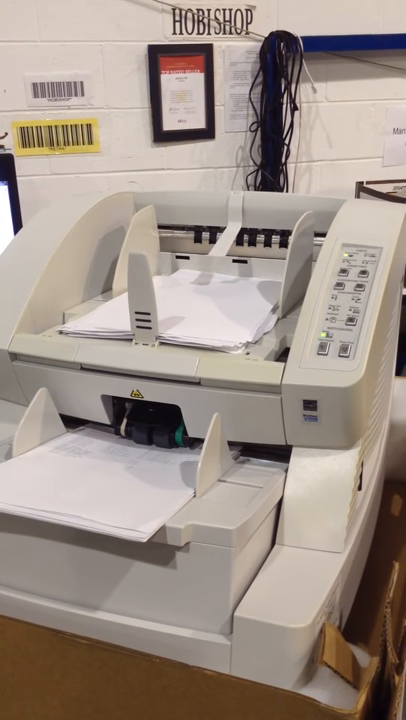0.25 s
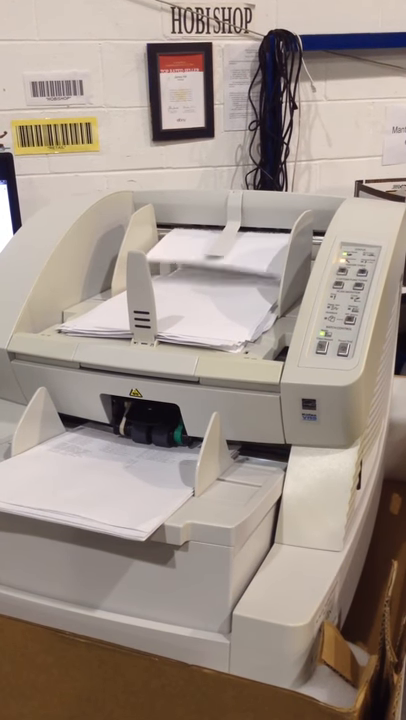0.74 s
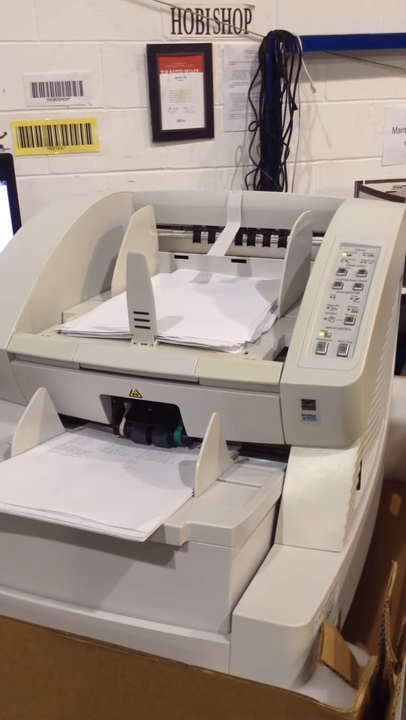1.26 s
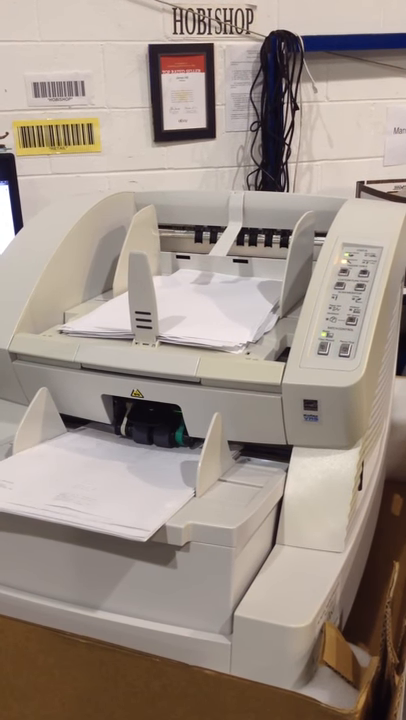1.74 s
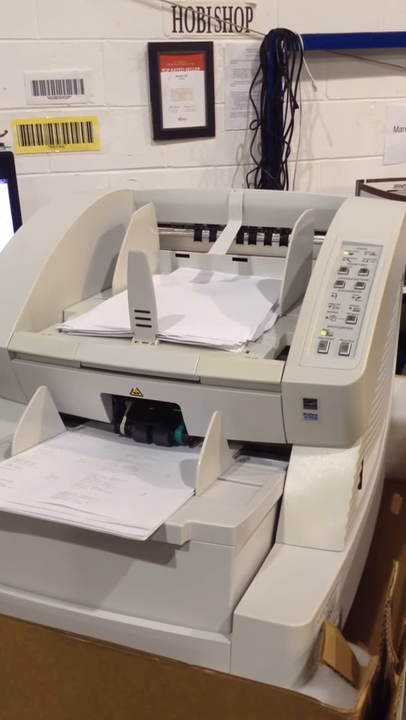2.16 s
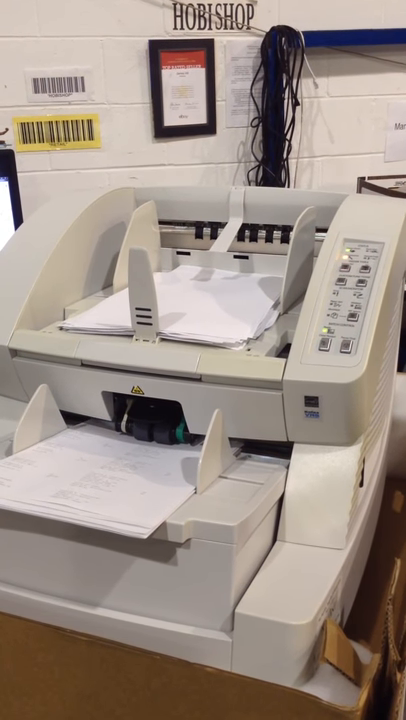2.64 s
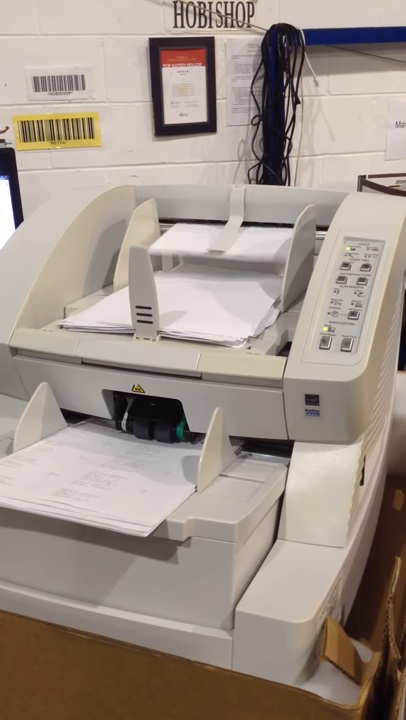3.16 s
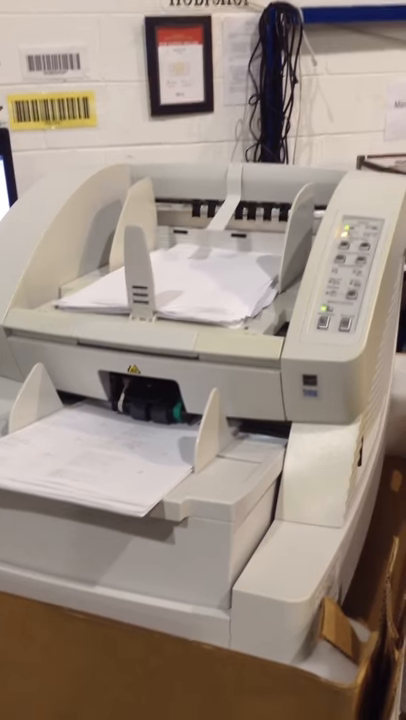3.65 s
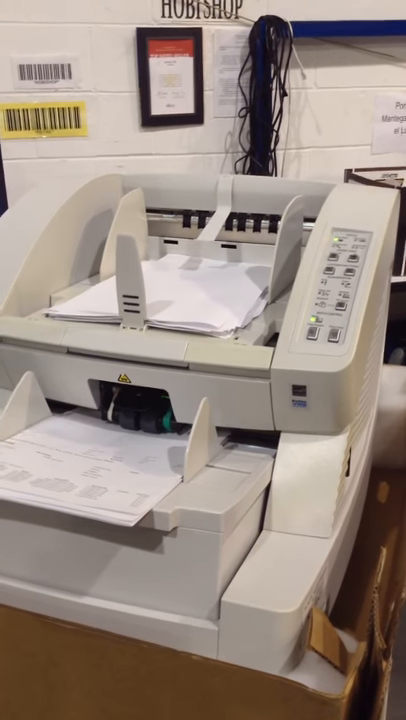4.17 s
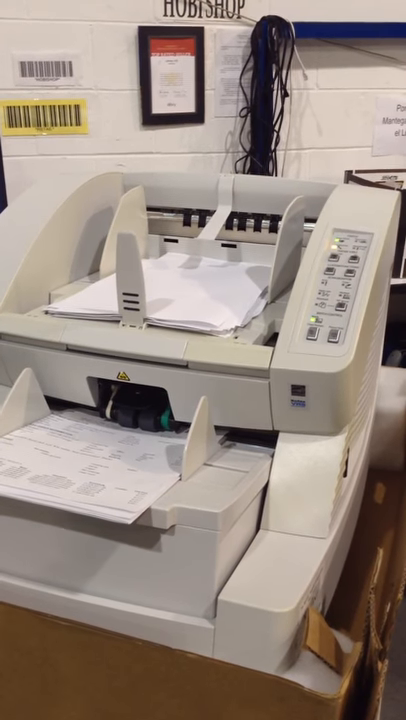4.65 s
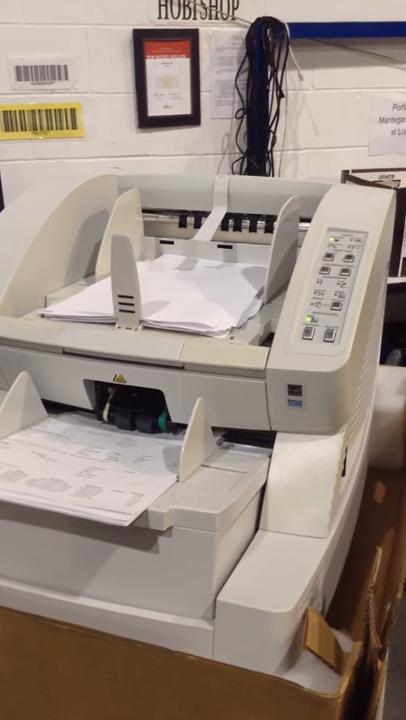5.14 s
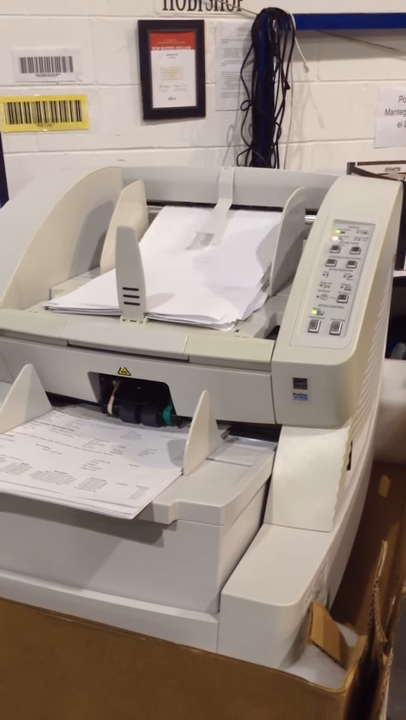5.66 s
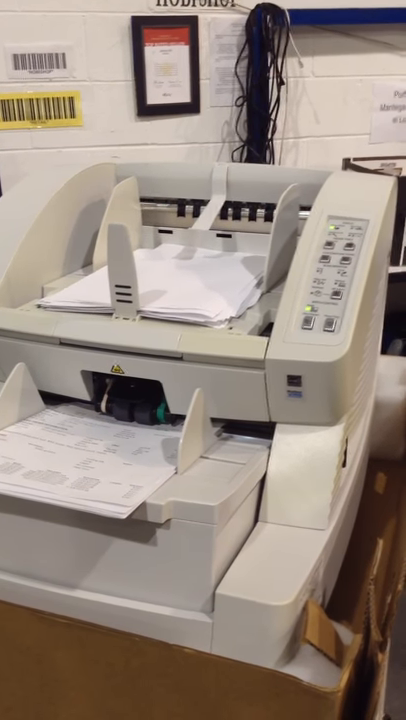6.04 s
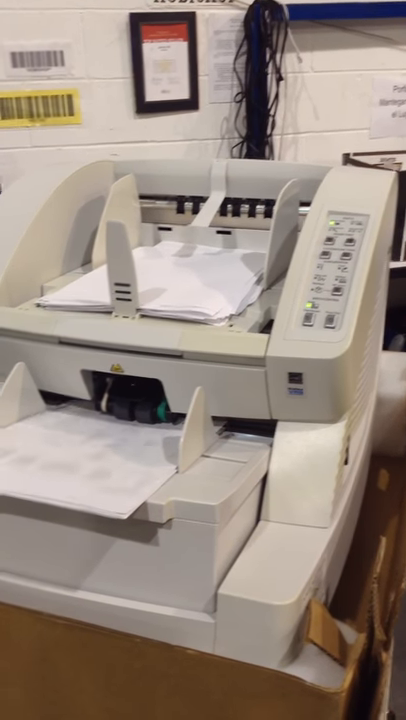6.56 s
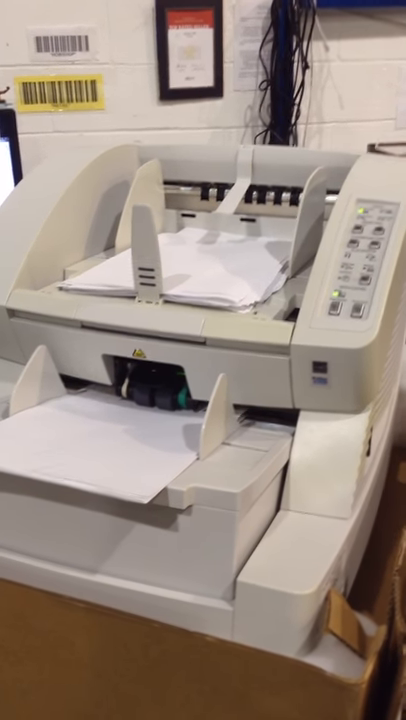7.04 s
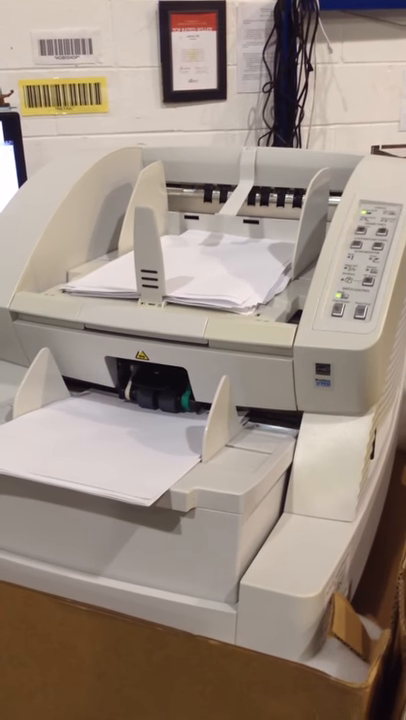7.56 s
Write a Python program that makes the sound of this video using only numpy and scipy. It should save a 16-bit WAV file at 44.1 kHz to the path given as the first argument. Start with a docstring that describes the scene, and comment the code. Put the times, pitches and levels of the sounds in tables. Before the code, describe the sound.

Heard up close in a small room, sheets of paper pass through a document scanner in a regular cycle. One swishes out with a flick and a snap, then the next is drawn in with a high hiss, clicks and soft thumps. This happens three times, with one loud clack about halfway. A motor whine and a fan's rush continue underneath.

```python
"""Document scanner, close up.

A stepping motor whines on steady orders over fan noise, roller hum and faint electrics.
Each sheet is pulled in with a bright hiss and a rumble, thumps the casing, rustles out on the tray
and snaps as its edges catch on rollers and guides. One microphone, small room."""
import sys
import numpy as np
from scipy import signal
from scipy.fft import rfft, irfft, next_fast_len
from scipy.io import wavfile
from scipy.ndimage import uniform_filter1d, map_coordinates

SR = 44100
rng = np.random.default_rng(int(sys.argv[2]) if len(sys.argv) > 2 else 0)


def bounce(signal):
    """Save signal as a 16-bit WAV file at the path given by the first command-line argument."""
    frames = np.transpose(np.atleast_2d(signal))
    limited = np.clip(frames, -1, 1)
    pcm = np.round(limited * 32767).astype(np.int16)
    wavfile.write(sys.argv[1], SR, pcm)


N = 343980

# Supply whine. Each row: time in seconds, frequency in Hz, rms level in dB.
SUPPLY_WHINE = [(0, 14495, -63), (.6, 14505, -65), (1, 14510, -76), (3, 14515, -78), (6.4, 14300, -74),
                (7.8, 14525, -68)]
# Motor tones. Each entry: multiple of the step rate.
MOTOR_ORDERS = [4, 6, 8, 12, 20, 35, 40, 45, 50, 55, 60, 85, 95, 100, 105, 110, 115, 120, 125, 135, 140,
                145, 150, 155, 160]
# Each entry: rms level in dB of the matching order.
ORDER_LEVELS_DB = [-66.5, -65.5, -49, -60, -62, -73.5, -74.5, -66.5, -87, -75.5, -77, -70, -76, -75, -72,
                   -72, -70, -69.5, -69, -83, -74, -70, -70, -72, -73]
# Spells of roller hum. Each row: start in seconds, end in seconds, rms level in dB.
ROLLER_HUMS = [(.45, .8, -54.5), (1.74, 2.0, -60), (2.815, 3.25, -54.5), (3.97, 4.453, -52.5),
               (5.05, 5.42, -54.5), (6.95, 7.25, -54.5), (7.601, 7.8, -57)]
# Spectra of fan, sliding paper and crinkling paper. Each row: frequency in Hz, relative density in dB.
FAN_SPECTRUM = [(25, -34), (60, -15.5), (150, -7), (230, -6.5), (450, -5.5), (650, -4), (900, -4),
                (1350, -8.5), (1550, -14), (2200, -15.5), (3200, -18), (5000, -20.5), (8000, -21),
                (12500, -22.5), (14300, -41), (15400, -35)]
HISS_SPECTRUM = [(2650, -22.5), (4500, -18.5), (6550, -10), (8010, -9), (9020, -6), (10400, -6.5),
                 (12900, 1), (14700, -2), (15400, -9)]
RUSTLE_SPECTRUM = [(500, -25), (900, 0), (2000, -2), (4000, -6), (6500, -7), (9000, -12), (15400, -26)]
# Casing resonances. Each row: centre in Hz, width in Hz, gain in dB.
CASING_MODES = [(144, 56, -3.5), (209, 62, 0.5), (289.5, 54, 0), (376, 66, -3.5), (680, 640, -12.5)]
# Sheets pulled in. Each row: bite, grip, hiss fade and release in seconds, then hiss, drag rustle,
# drag rumble, grip rustle, grip rumble and release rumble in dB.
SHEET_FEEDS = [(1.701, 1.794, 2.27, 2.3, -41.5, -56.5, -54, -45.5, -38, -44),
               (3.98, 4.057, 4.485, 4.57, -40.5, -54.5, -52.5, -47.5, -38.5, -42),
               (6.56, 6.673, 7.06, 7.2, -43.5, -51, -50.5, -45, -40.5, -49)]
# Sheets pushed out. Each row: emergence, edge flick and drop in seconds, then hiss, flick, rustle in dB.
SHEET_EXITS = [(0.537, .92, 1.13, -52.5, -41, -56), (3.02, 3.338, 3.54, -50.5, -40.5, -58.5),
               (5.236, 5.629, 5.76, -52, -40.5, -56.5)]
# Loose crinkles of the stacks. Each row: time in seconds, then rustle, hiss and rumble in dB.
STACK_CRINKLES = [(.01, -50.5, -52, -51), (.385, -49, -52, -64), (.45, -48, -60, -59),
                  (1.18, -60, -50, -66), (1.55, -50, -49, -66), (1.64, -45.5, -50, -50),
                  (2.43, -67, -48.5, -64), (2.57, -65, -54, -56), (3.34, -51, -60, -65),
                  (3.49, -54, -55, -58), (3.69, -51, -54, -53), (4.57, -48, -62, -60),
                  (4.69, -56, -51, -58), (5.3, -52.5, -56, -58), (5.64, -49, -60, -60),
                  (5.75, -47, -55, -45), (5.97, -57, -64, -53), (7.31, -53, -50.5, -56),
                  (7.44, -49, -54, -47)]
# Floor between sheets: rustle, hiss and rumble in dB.
PAPER_FLOOR_DB = (-63, -59, -55.5)
# Sheets hitting the casing. Each row: start in seconds, level in dB, pitch in Hz, T60 in seconds.
CASING_THUMPS = [(.277, -34.5, 543, 0.046), (1.681, -36.5, 371, 0.24), (1.726, -32, 259, 0.086),
                 (2.291, -35.5, 249, 0.2), (2.563, -35, 620, 0.046), (3.6250, -9.5, 425, 0.015),
                 (3.853, -33.5, 387, 0.044), (3.973, -29, 269, 0.082), (4.06, -28.5, 331, 0.13),
                 (4.294, -33.5, 298, 0.082), (4.551, -35, 307, 0.12), (4.817, -29, 334, 0.032),
                 (5.19, -34.5, 375, 0.043), (5.341, -34.5, 603, 0.037), (5.53, -39, 610, .04),
                 (5.965, -31, 548, 0.11), (6.606, -39, 377, 0.12), (6.669, -31, 271, 0.19),
                 (7.18, -34.5, 244, 0.13)]
# Edges catching. Each row: start in seconds, ring peak in dB, knock and crackle in dB over the ring,
# pitch in Hz, T60 in seconds.
EDGE_SNAPS = [(0.277, -38, -11, 5, 1920, 0.035), (0.375, -32.5, -21, -5, 1467, 0.13),
              (.3894, -33, -16, -6, 4400, 0.067), (1.0466, -24, -13, 4, 3180, 0.0088),
              (1.0486, -24.5, -2, -3, 2120, 0.026), (1.5284, -48, -11, 8, 2480, .05),
              (1.6677, -43.5, 8, 13.5, 2970, 0.09), (1.703, -40, -4, 6, 1740, .04),
              (1.7719, -34.5, -6, 13, 2640, 0.023), (1.8044, -34, 2.5, -4, 1730, 0.053),
              (2.2989, -39.5, 6, 4, 1700, 0.033), (2.4264, -47, -3, 9, 2590, 0.035),
              (3.4686, -27, -3.5, 1, 2470, 0.035), (3.4853, -36, -6, -4, 2620, .03),
              (3.6196, -34, -8, -14, 3460, 0.0041), (3.6220, -12.5, -7, -7, 1570, 0.0063),
              (3.7987, -41, 9.5, 12.5, 4410, 0.013), (3.941, -47, -5, 10, 3484, .02),
              (3.97, -43, 4, 13, 1830, 0.043), (4.026, -39, 4, 13, 2370, 0.033),
              (4.0562, -33, 4, 3, 1825, .07), (4.5316, -24.5, -11, 3, 1694, 0.034),
              (5.7252, -27, -3.5, -2, 2290, 0.045), (5.7416, -38, 0, -3, 2550, 0.049),
              (6.552, -40, 5.5, 5, 2360, 0.047), (6.6755, -31, 2.5, 3, 1360, 0.11),
              (7.146, -31, -6, 10, 1910, 0.022), (7.1727, -41.5, 4, 6, 1410, 0.062),
              (7.4344, -45, 4, 5, 1770, .04)]

STEP_HZ, FAN_DB = 94.69, -50.5
MAINS_HZ, MAINS_DB = 122.2, -69.5
# Rise and fall times over 30 dB.
FEED_S, EXIT_S, HUM_S = (0.055, 0.062), (0.54, 0.22), (0.41, 0.12)
JOLT_S, SHAKE_S, FLICK_S = (0.1, 0.15), (0.22, 0.21), (0.037, 0.097)


def amp(db):
    """Decibels to gain."""
    return 10 ** (np.asarray(db) / 20)


def unit_rms(x):
    """Scaled to rms 1."""
    return x / np.sqrt(np.mean(x ** 2) + 1e-20)


def unit_peak(x):
    """Scaled to peak 1."""
    return x / np.max(np.abs(x))


def wobble(rate_hz):
    """Smooth random curve through Gaussian knots."""
    knots = rng.standard_normal(int(N * rate_hz / SR) + 4)
    grid = np.arange(0, N + 16, 16)
    return np.interp(np.arange(N), grid, map_coordinates(knots, [grid * rate_hz / SR]))


def swell(start_s, end_s, db, slopes_s):
    """Power envelope: climbs until start, holds until end, sinks."""
    rise_s, fall_s = slopes_s
    t = np.arange(N) / SR
    outside = np.maximum((start_s - t) / rise_s, (t - end_s) / fall_s)
    return amp(2 * (db - 30 * np.maximum(0, outside)))


def filtered(x, response):
    """FFT filter; response is a function of Hz."""
    size = next_fast_len(len(x) + 8192)
    return irfft(rfft(x, size) * response(np.fft.rfftfreq(size, 1 / SR)), size)[:len(x)]


def spectrum(points):
    """Response through (Hz, dB) points on a log axis."""
    knots_hz, db = np.transpose(points)
    return lambda hz: amp(np.interp(np.log(hz + 1), np.log(knots_hz + 1), db, left=-120, right=-120))


def modes(rows):
    """Causal response of (centre Hz, width Hz, dB) resonances, alternating in sign."""
    return lambda hz: sum((-1) ** k * amp(db) * 1j * hz * width / (centre**2 - hz**2 + 1j * hz * width)
                          for k, (centre, width, db) in enumerate(rows))


def rush(response, patchy_db, grain_db):
    """Noise of rms 1 with fast grains and patches of gain in time and frequency."""
    grains = rng.standard_normal(N) * amp(grain_db * wobble(400))
    bins = signal.stft(grains, nperseg=512)[2]
    patches = uniform_filter1d(uniform_filter1d(rng.standard_normal(bins.shape), 6, 0), 8, 1)
    noise = signal.istft(bins * amp(patchy_db * unit_rms(patches)), nperseg=512)[1][:N]
    return unit_rms(filtered(noise, response))


def roughness(db, hard_db=-22.5):
    """Gain of a blow's noisy part: hard blows ring cleaner."""
    return amp(-0.75 * max(0, db - hard_db))


def room(x, t60_s=0.069, delay_samples=200):
    """Short, dull wall reflections."""
    t = np.arange(SR // 3) / SR
    tail = filtered(rng.standard_normal(len(t)) * amp(-60 * t / t60_s), modes([(2500, 14000, 0)]))
    return signal.fftconvolve(np.pad(x, (delay_samples, 0)), tail / np.linalg.norm(tail))[:N]


def electrics():
    """Mains hum and a thin supply whine that comes and goes."""
    t = np.arange(N) / SR
    times_s, hz, db = np.transpose(SUPPLY_WHINE)
    whine_phase = 2 * np.pi * np.cumsum(np.interp(t, times_s, hz)) / SR
    whine = amp(np.interp(t, times_s, db)) * np.sin(whine_phase)
    mains = amp(MAINS_DB + 2.6 * wobble(8)) * np.sin(2 * np.pi * MAINS_HZ * t)
    return np.sqrt(2) * (mains + whine)


def fan():
    """Steady rush of air."""
    return amp(FAN_DB) * rush(spectrum(FAN_SPECTRUM), patchy_db=2.5, grain_db=0.5)


def motor(rumble_db, idle_hum_db=-68):
    """Wavering step orders; uneven roller drag hums on the third, the shaking casing on the fourth."""
    phase = 2 * np.pi * STEP_HZ * np.arange(N) / SR
    whine = np.zeros(N)
    for order, db in zip(MOTOR_ORDERS, ORDER_LEVELS_DB):
        waver_db = np.log10(order) * (0.8 * wobble(2) + 0.7 * wobble(9))
        whine += amp(db + waver_db) * np.sin(order * phase + rng.uniform(0, 2 * np.pi))
    drag_power = amp(2 * idle_hum_db) + sum(swell(*spell, HUM_S) for spell in ROLLER_HUMS)
    roller = np.sqrt(drag_power) * amp(2.8 * wobble(12)) * np.sin(3 * phase + 0.48 * wobble(15))
    casing = amp(rumble_db - 9 + 2.9 * wobble(20)) * np.sin(4 * phase)
    return np.sqrt(2) * (whine + roller + casing)


def paper_levels_db(surge_lead_s=0.028):
    """Rustle, hiss and rumble envelopes as sheets go in, come out and crinkle."""
    rustle, hiss, rumble = (np.full(N, amp(2 * db)) for db in PAPER_FLOOR_DB)
    for bite_s, grip_s, fade_s, release_s, *levels_db in SHEET_FEEDS:
        hiss_db, drag_rustle_db, drag_rumble_db, grip_rustle_db, grip_rumble_db, release_db = levels_db
        surge_s = grip_s - surge_lead_s
        hiss += swell(bite_s, fade_s, hiss_db, FEED_S)
        hiss += swell(surge_s, surge_s, hiss_db + 1, JOLT_S)
        hiss += swell(fade_s, release_s, hiss_db - 8.5, FEED_S)
        rustle += swell(bite_s, release_s, drag_rustle_db, FEED_S)
        rustle += swell(grip_s, grip_s, grip_rustle_db, JOLT_S)
        rumble += swell(bite_s, release_s, drag_rumble_db, FEED_S)
        rumble += swell(bite_s, grip_s, grip_rumble_db - 7.5, FEED_S)
        rumble += swell(grip_s, grip_s, grip_rumble_db, SHAKE_S)
        rumble += swell(release_s, release_s, release_db, SHAKE_S)
    for emerge_s, flick_s, drop_s, hiss_db, flick_db, rustle_db in SHEET_EXITS:
        hiss += swell(emerge_s, flick_s, hiss_db - 1.5, JOLT_S)
        hiss += swell(flick_s, drop_s, hiss_db, EXIT_S)
        hiss += swell(flick_s, flick_s, flick_db, FLICK_S)
        rustle += swell(emerge_s, drop_s, rustle_db, JOLT_S)
    for at_s, rustle_db, hiss_db, rumble_db in STACK_CRINKLES:
        rustle += swell(at_s, at_s, rustle_db, JOLT_S)
        hiss += swell(at_s, at_s, hiss_db, FLICK_S)
        rumble += swell(at_s, at_s, rumble_db, SHAKE_S)
    return 10 * np.log10([rustle, hiss, rumble])


def sheets(rustle_db, hiss_db, rumble_db):
    """Paper slides on paper, crinkles and shakes the casing in lumps."""
    flutter_db = wobble(14)
    hiss = amp(hiss_db + 0.3 * flutter_db) * rush(spectrum(HISS_SPECTRUM), patchy_db=0.5, grain_db=1.2)
    rustle = amp(rustle_db + flutter_db) * rush(spectrum(RUSTLE_SPECTRUM), patchy_db=3, grain_db=0.5)
    panels = lambda hz: modes(CASING_MODES)(hz) / (1 + (125 / (hz + 1)) ** 4 + (hz / 900) ** 2)
    rumble = unit_rms(amp(2 * wobble(30)) * rush(panels, patchy_db=1, grain_db=0.2))
    return hiss + rustle + amp(rumble_db) * rumble


def thumps(attack_s=0.00099):
    """Soft blows on the casing: a low ring blurred by the rattle of loose panels."""
    out, t = np.zeros(N + SR), np.arange(SR // 4) / SR
    for start_s, db, hz, t60_s in CASING_THUMPS:
        rattle = unit_rms(filtered(rng.standard_normal(len(t)), modes([(1.32 * hz, 0.51 * hz, 0)])))
        ring = np.sin(2 * np.pi * hz * t) + 0.6 * roughness(db) * rattle
        envelope = amp(db - 2 - 60 * t / t60_s) * (1 - np.exp(-t / attack_s))
        out[round(start_s * SR):][:len(t)] += envelope * ring
    return out[:N]


def snaps(attack_s=0.00041):
    """An edge catches: short ring of the taut sheet, quicker treble crackle, knock in the guides."""
    out, t = np.zeros(N + SR), np.arange(SR // 8) / SR
    treble = modes([(7500, 3100, -4), (13300, 4300, 0.5)])
    guides = modes([(905, 366, 0)])
    for start_s, db, knock_db, crackle_db, hz, t60_s in EDGE_SNAPS:
        noise = rng.standard_normal((3, len(t)))
        envelope = amp(-60 * t / t60_s) * (1 - np.exp(-t / attack_s))
        rasp = unit_rms(filtered(noise[0], modes([(1.22 * hz, 0.66 * hz, 0), (5000, 4000, -12)])))
        ring = unit_peak(envelope * (0.73 * roughness(db) * rasp - np.sin(2 * np.pi * hz * t)))
        crackle = amp(crackle_db) * unit_peak(filtered(noise[1] * envelope ** 2, treble))
        knock = amp(knock_db) * unit_peak(filtered(noise[2] * envelope, guides))
        out[round(start_s * SR):][:len(t)] += amp(db) * (ring + crackle + knock)
    return out[:N]


def scene():
    """Mono mix on two channels; only snaps and thumps feed the room."""
    hits = snaps() + thumps()
    rustle_db, hiss_db, rumble_db = paper_levels_db()
    machine = motor(rumble_db) + fan() + electrics()
    mono = machine + sheets(rustle_db, hiss_db, rumble_db) + hits + amp(-23) * room(hits)
    return np.array([mono, mono])


def record(dry, bass_hz=100, edge_hz=15330, limit_hz=16500):
    """Recorder response: thin deep bass, a 30 dB drop at the treble edge, nothing above the limit."""
    bass = lambda hz: 0.02 + 1 / (1 + (bass_hz / (hz + 1)) ** 3)
    treble = lambda hz: np.where(hz < edge_hz, 1, amp(-30)) * (hz < limit_hz)
    return np.array([filtered(channel, lambda hz: bass(hz) * treble(hz)) for channel in dry])


dry = scene()
out = record(dry)
bounce(out)
```